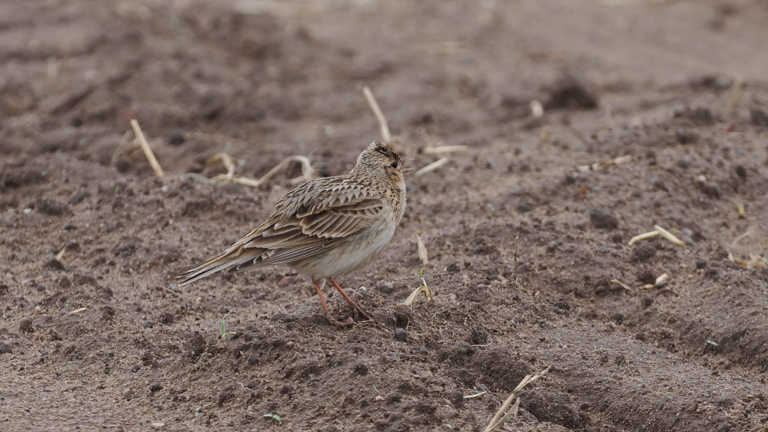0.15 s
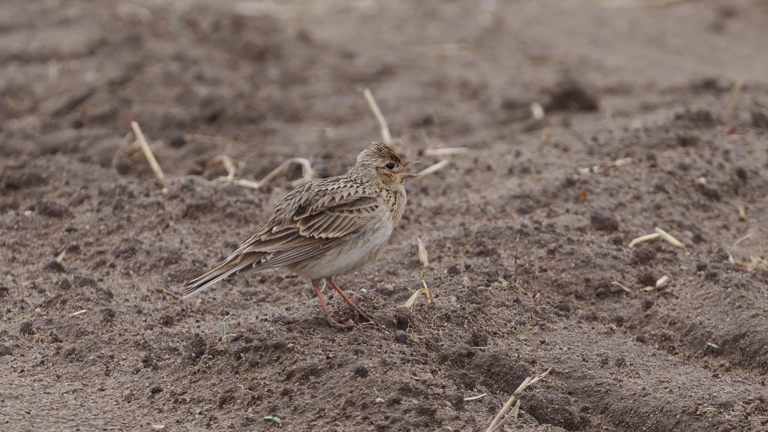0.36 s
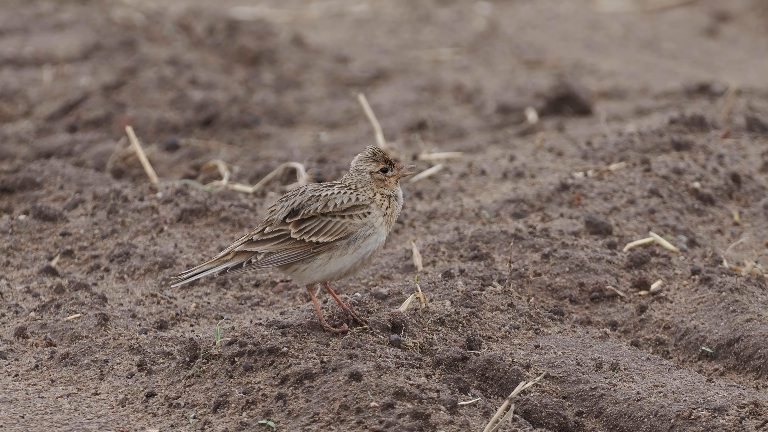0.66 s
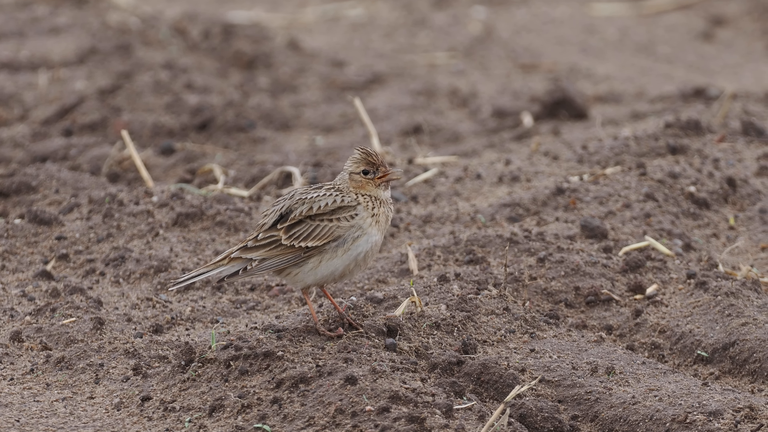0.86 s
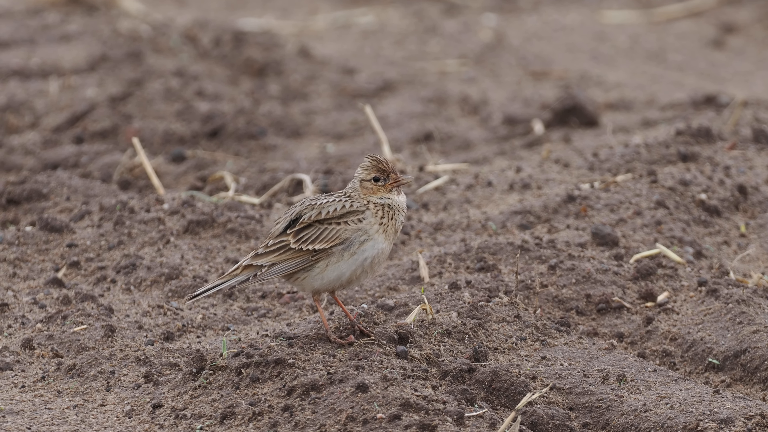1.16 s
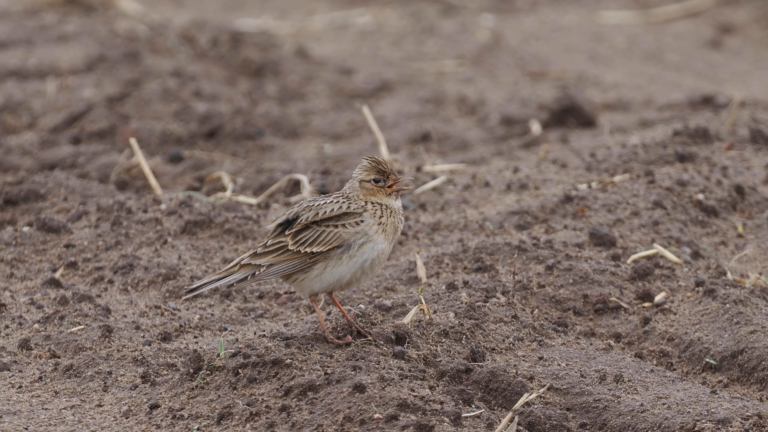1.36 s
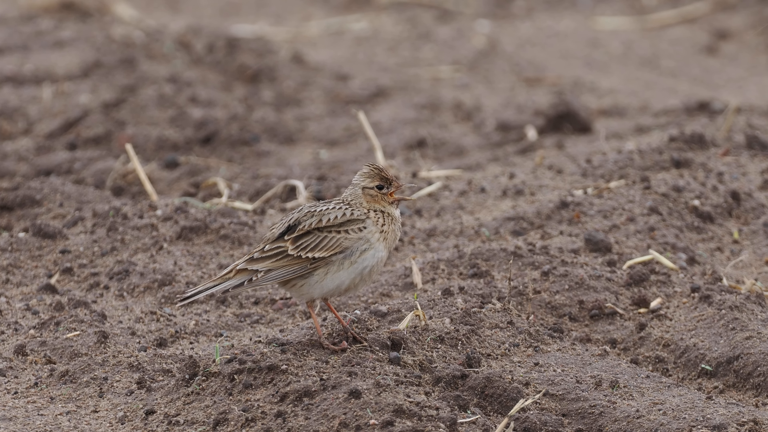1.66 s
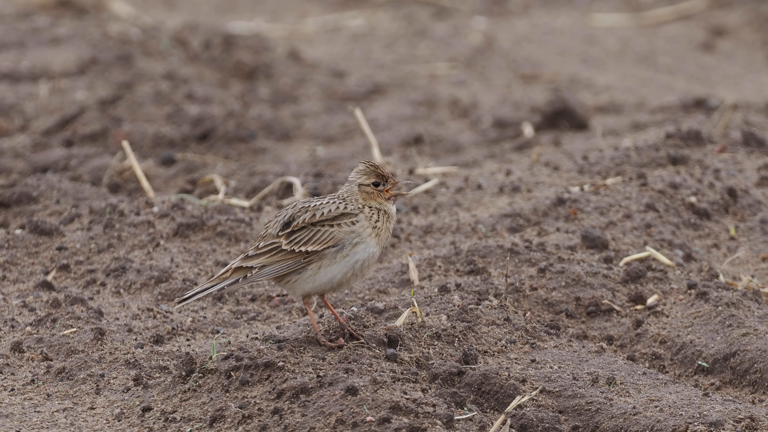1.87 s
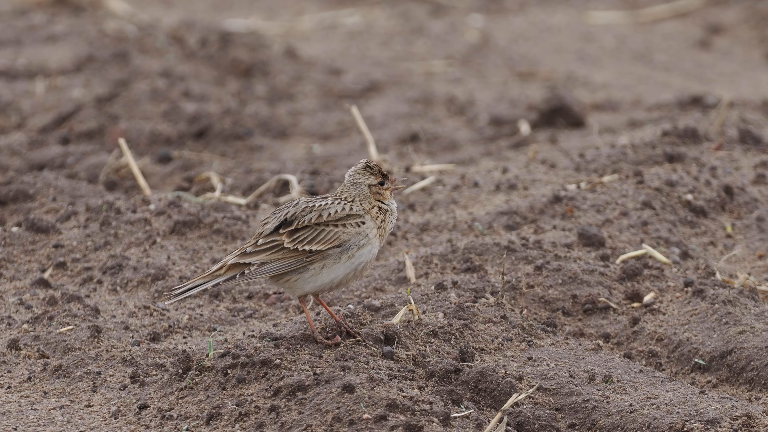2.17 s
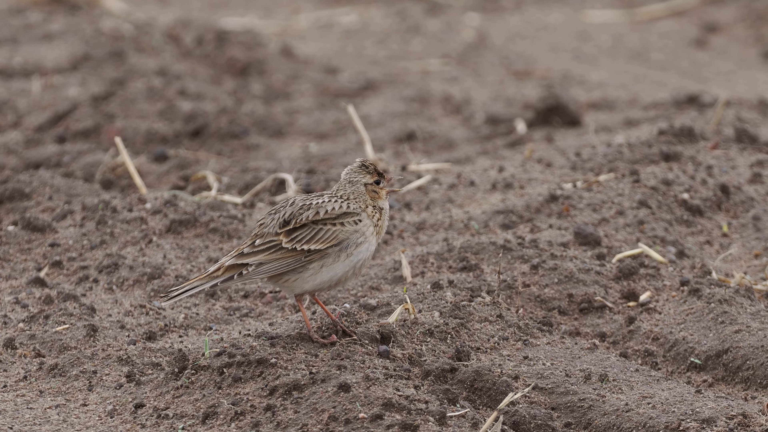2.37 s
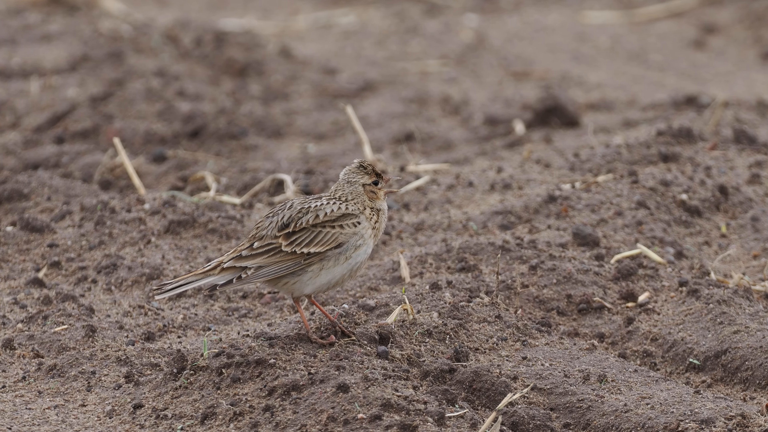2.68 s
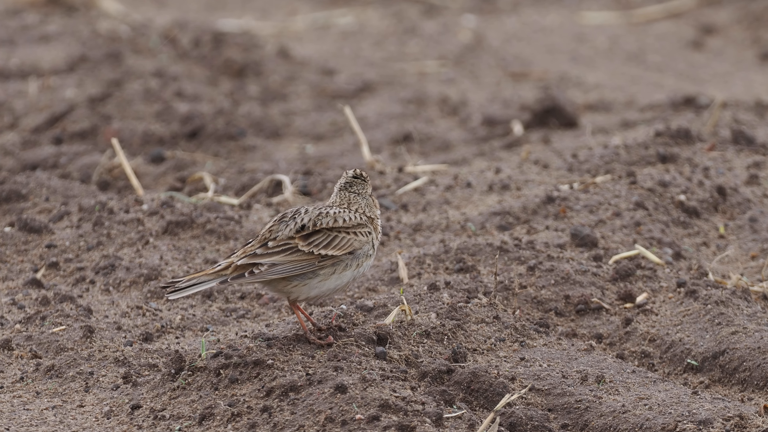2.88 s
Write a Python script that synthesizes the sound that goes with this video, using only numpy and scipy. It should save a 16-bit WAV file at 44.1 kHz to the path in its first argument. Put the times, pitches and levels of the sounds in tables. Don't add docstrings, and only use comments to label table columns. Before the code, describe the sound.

Skylark song pours out without pause, rough churrs, falling buzzes and clear whistles, with low wind gusts.

```python
import sys
import numpy as np
from scipy import signal
from scipy.io import wavfile
from scipy.ndimage import uniform_filter1d

SR = 44100
rng = np.random.default_rng(int(sys.argv[2]) if len(sys.argv) > 2 else 0)


def dump_mix(stems):
    frames = np.atleast_2d(stems).T
    limited = np.clip(frames, -1, 1)
    pcm = np.round(limited * 32767).astype(np.int16)
    wavfile.write(sys.argv[1], SR, pcm)


def linear_from_db(decibels):
    return 10 ** (np.asarray(decibels, float) / 20)


N = 132300

# pitch_hz, level_db
THROAT = [(2000, -3), (3000, 0), (5200, 0), (6300, -14), (7500, 1), (8800, -15), (15000, -17)]


def evened(x):
    return x / np.sqrt(np.mean(x ** 2) + 1e-20)


def read(points, hz):
    f, value = np.transpose(points)
    return np.interp(np.log(hz + 1), np.log(f + 1), value)


def add(mix, start_s, sound):
    k = round(start_s * SR)
    sound = sound[..., max(-k, 0):]
    part = mix[..., max(k, 0):][..., :sound.shape[-1]]
    part += sound[..., :part.shape[-1]]


def clock(length_s):
    return np.arange(0, length_s, 1 / SR)


def wobble(n, per_s):
    width = int(SR / per_s)
    smooth = uniform_filter1d(rng.standard_normal(n + 99), width)
    return evened(uniform_filter1d(smooth, width))[:n]


def soft_ends(t, rise_s, fall_s):
    ramp = np.minimum(t / rise_s, (t[-1] - t) / fall_s)
    return np.sin(np.pi / 2 * np.clip(ramp, 0, 1)) ** 2


def tone(hz, gain, over_db, beak=THROAT, shake_hz=25, shake_db=.8):
    shaky_hz = hz + shake_hz * wobble(len(hz), 600)
    phase = 2 * np.pi * (np.cumsum(shaky_hz) / SR + rng.random())
    partials = 0
    for k, db in enumerate((0, *over_db), 1):
        partials = partials + linear_from_db(db + read(beak, k * hz)) * np.sin(k * phase)
    shaky_gain = gain * linear_from_db(shake_db * wobble(len(hz), 510))
    return np.sqrt(2) * shaky_gain * partials


def glide(mix, at, level_db, notes, pitch=1, over_db=(-20, -30), shake_hz=60, shake_db=3.0):
    for after, length, from_hz, to_hz, db in notes:
        t = clock(length)
        sweep_hz = from_hz + (to_hz - from_hz) * (t / length) ** 0.97
        hz = pitch * sweep_hz * rng.uniform(0.97, 1.02)
        note_db = level_db + db + 0.86 * rng.standard_normal()
        gain = linear_from_db(note_db) * soft_ends(t, length * 0.37, length * 0.41)
        add(mix, at + after, tone(hz, gain, over_db, THROAT, shake_hz, shake_db))


def churrs():
    # start_s, head_db, tail_db, last_beat_s
    of_4 = [(1.2675, -17, -33.5, 1.370), (-.104, -30, -34, 0.01583)]
    of_5 = [(0.0603, -28.5, -35, .187), (0.2207, -26.5, -34.5, .338), (1.4144, -21.5, -34.5, 1.536),
            (1.9789, -23.5, -32.5, 2.100), (2.141, -24.5, -34.5, 2.256)]
    of_6 = [(0.3883, -23, -34, .527), (0.5716, -27.5, -34, .710)]
    # after_start_s, length_s, from_hz, to_hz, level_db
    head = [(-.002, 0.0073, 2800, 3800, -26.5), (0, 0.0051, 4200, 4870, -5),
            (.006, 0.0044, 5500, 3930, -11), (.0105, 0.006, 4340, 4650, -0.5),
            (.017, 0.0059, 5110, 4100, -15), (.0215, 0.0065, 4200, 4440, -1),
            (.029, 0.0077, 5390, 3610, -10.5), (.0325, 0.0051, 3710, 3030, -11.5),
            (.0365, 0.006, 3340, 4370, -19.5), (.0435, 0.004, 4900, 3580, -16)]
    # after_beat_s, length_s, from_hz, to_hz, level_db
    beat = [
        (-.0005, .003, 4700, 3500, -12),
        (.0018, 0.004, 3500, 2300, 0.5),
        (.0065, 0.0072, 2250, 3300, 0.5),
        (.0135, 0.005, 3150, 3100, -14),
    ]
    beat_s, hurry_s, sink = .0193, 0.0027, 0.028
    out = np.zeros(N)
    for beats, syllables in enumerate((of_4, of_5, of_6), 4):
        for start, head_db, tail_db, end in syllables:
            glide(out, start, head_db, head, over_db=(-24, -40), shake_hz=40.7, shake_db=2.13)
            for k in range(beats):
                last = k == beats - 1
                at = end - (beats - 1 - k) * beat_s + hurry_s * (k == 0)
                notes = beat[:2] if last else beat
                glide(out, at, tail_db - 9.2 * last, notes, 1.03 - sink * k, (-21, -26), 100, 2.7)
    return out


def slides():
    # start_s, length_s, level_db, buzz_per_s
    calls = [
        (0.744, 0.122, -16, 310),
        (0.9175, .135, -17, 304),
        (1.0888, .132, -15.5, 291),
    ]
    # time_s, top_hz, level_db, buzz_depth_hz, doubled_share
    shape = [(0, 4960, -13, 555, 0), (0.02, 5190, 0.5, 705, 0.25), (0.048, 4780, -2.5, 744, 0),
             (0.06, 4400, -6, 814, 0), (0.069, 4100, -11, 1000, .9), (0.08, 3403, -17, 934, .8),
             (0.101, 2950, -15, 652, 0.18), (0.135, 2566, -20, 427, 0)]
    # time_s, share_of_starting_rate
    buzz_speed = [(0, 1), (.05, .895), (.095, .88), (.136, .68)]
    dip_depth, lag_rad, skew, narrow = .88, .6, .45, 1.4
    out = np.zeros(N)
    s, top_hz, db, depth_hz, double = np.transpose(shape)
    for start, length, level_db, rate in calls:
        t = clock(length)
        phase = 2 * np.pi * np.cumsum(rate * np.interp(t, *np.transpose(buzz_speed))) / SR
        twice = np.clip(np.interp(t, s, double), 0, 1)
        pitch_dip = (.5 + .5 * np.cos(phase + lag_rad)) ** 1.3
        hz = np.interp(t, s, top_hz) - np.interp(t, s, depth_hz) * pitch_dip
        single_dip = (.5 + .5 * np.cos(phase + skew * np.cos(phase))) ** narrow
        double_dip = .5 + .5 * np.cos(2 * phase + 2 * lag_rad)
        dip = (1 - twice) * single_dip + twice * double_dip
        gain = linear_from_db(level_db + np.interp(t, s, db)) * (1 - dip_depth * dip)
        gain = gain * soft_ends(t, 0.0062, 0.0029)
        add(out, start, tone(hz, gain, (-24, -26), shake_hz=25 + 400 * t, shake_db=.3 + 9 * t))
    return out


def runs():
    # start_s, level_db, pitch_share
    phrases = [
        (1.576, -27.5, 1),
        (1.707, -26, 0.99),
        (1.842, -26.5, 1.01),
    ]
    # after_start_s, length_s, from_hz, top_hz, level_db
    steps = [
        (-.001, 0.01, 2050, 2900, 0),
        (.010, 0.0096, 2820, 3760, 3),
        (0.015, 0.015, 2815, 3514, -2.5),
        (0.028, 0.024, 2590, 3360, -6),
        (.044, .015, 2410, 2820, 1.5),
        (.0625, 0.018, 2160, 2536, -0.5),
        (0.081, .019, 2060, 2148, -5.5),
    ]
    # pitch_hz, level_db
    beak = [(2000, -17), (3700, -15), (5000, 0.5), (6400, -20), (7400, -15.5), (9500, -48), (12000, -19.5),
            (14000, -44)]
    rise_s, sag = 0.0025, 0.052
    out = np.zeros(N)
    for start, level_db, pitch in phrases:
        for after, length, from_hz, top_hz, db in steps:
            t = clock(length)
            hook_hz = top_hz - (top_hz - from_hz) * np.exp(-t / rise_s)
            hz = pitch * hook_hz * (1 - sag * (t / 0.013) ** 2)
            gain = linear_from_db(level_db + db) * soft_ends(t, 0.0012, 0.0066)
            add(out, start + after, tone(hz, gain, (-1.5, -7, -6.0, -15), beak, shake_db=2.66))
        out += second_voice(start, level_db)
    return out


def second_voice(start, level_db):
    # after_start_s, length_s, from_hz, to_hz, level_db
    crossings = [
        (.009, 0.0032, 5400, 4000, -5.5),
        (.012, 0.0044, 4300, 3480, -10),
        (.018, 0.004, 5300, 4040, -13),
        (.030, 0.0025, 4800, 5400, -18.5),
        (.080, .003, 4400, 4400, -28),
        (.011, 0.0036, 6440, 7710, -11.5),
        (.020, .005, 6200, 7600, -15),
        (.031, .005, 5500, 6900, -7),
    ]
    out = np.zeros(N)
    glide(out, start, level_db, crossings)
    return out


def trill():
    # time_s, pitch_hz, level_db
    lead = [(2.32, 6410, -26.5), (2.329, 6450, -40.5), (2.329, 6390, -23), (2.342, 6390, -25),
            (2.351, 5650, -29.5), (2.3518, 5600, -23), (2.357, 4840, -22), (2.362, 4280, -45),
            (2.365, 3360, -34.5)]
    start_s, end_s, per_s = 2.3635, 2.424, 92.4
    centre_hz, swing_hz, level_db = 4400, 1140, -23
    beak_hz, beak_wide_hz, floor_db = 4900, 486, -18.5
    out = np.zeros(N)
    s, lead_hz, db = np.transpose(lead)
    t = np.arange(s[0], s[-1], 1 / SR)
    pulse = .5 + .5 * np.cos(2 * np.pi * 210 * (t - 2.3335))
    flutter = 1 - .5 * np.clip((2.35 - t) / 0.0043, 0, 1) * pulse
    gain = linear_from_db(np.interp(t, s, db)) * flutter * soft_ends(t - s[0], .001, 0.0042)
    add(out, s[0], tone(np.interp(t, s, lead_hz), gain, (-24, -40)))
    t = clock(end_s - start_s)
    zigzag = np.arcsin(.97 * np.cos(2 * np.pi * per_s * t)) / 1.3
    hz = centre_hz - swing_hz * zigzag
    beak = np.exp(-((hz - beak_hz) / beak_wide_hz) ** 2) + linear_from_db(floor_db)
    gain = linear_from_db(level_db) * beak * soft_ends(t, 0.012, .012)
    add(out, start_s, tone(hz, gain, (-28, -40), shake_hz=80, shake_db=-5.2))
    return out


def whistles():
    # start_s, length_s, level_db, top_hz, fall_hz
    notes = [
        (2.452, 0.029, -22, 4900, 461),
        (2.499, 0.025, -23, 4934, 343),
        (2.541, 0.032, -23.5, 4890, 246),
        (2.586, .034, -24.5, 4826, 219.6),
        (2.629, .036, -27, 4768, 154.2),
        (2.721, 0.016, -30.5, 4596, 190),
    ]
    out = np.zeros(N)
    for start, length, db, top_hz, fall_hz in notes:
        t = clock(length)
        hz = top_hz - fall_hz * (t / length) ** 2.4 - 60 * np.exp(-t / 0.0034)
        gain = linear_from_db(db) * soft_ends(t, .008, .006)
        add(out, start, tone(hz, gain, (-24, -22), shake_hz=10, shake_db=.4))
    return out


def warble():
    # start_s, low_hz, top_hz, low_db, top_db
    beats = [
        (2.737, 3113, 4420, -34, -36.5),
        (2.7629, 2994, 4430, -36.5, -38),
        (2.7895, 2940, 4214, -38.5, -44.5),
        (2.8165, 2763, 4120, -39.5, -40),
        (2.842, 2880, 3940, -39.5, -39.5),
        (2.868, 2800, 3805, -38.5, -39),
        (2.896, 2766, 3640, -38, -37),
        (2.9223, 2764, 3810, -39, -40.5),
        (2.947, 2767, 2825, -42.5, -58.5),
    ]
    # time_s, share_of_climb, share_of_top_level, level_db
    shape = [(0, 0, 0, -5), (.003, .04, 0, 0), (.0105, 0, 0, -1), (.0135, .35, .5, -6), (.016, .93, 1, -3),
             (.0195, 1, 1, 0), (.021, .8, 1, -3), (.023, .05, .6, -1), (.0255, -.2, .5, -10)]
    hook_share, hook_s = .22, .0013
    out = np.zeros(N)
    s, climb, share, db = np.transpose(shape)
    t = clock(s[-1])
    for at, low_hz, top_hz, low_db, top_db in beats:
        arch_hz = low_hz + (top_hz - low_hz) * np.interp(t, s, climb)
        hz = uniform_filter1d(arch_hz, size=50) - hook_share * low_hz * np.exp(-t / hook_s)
        beat_db = low_db + (top_db - low_db) * np.interp(t, s, share) + np.interp(t, s, db)
        gain = linear_from_db(beat_db) * soft_ends(t, 0.0039, 0.0014)
        add(out, at, tone(hz, gain, (-17, -30), shake_hz=35, shake_db=1.6))
    return out


def band_noise(low_hz, high_hz):
    sos = signal.butter(3, (low_hz, high_hz), "band", fs=SR, output="sos")
    return evened(signal.sosfilt(sos, rng.standard_normal((2, N))))


def rasp(song):
    breath = band_noise(6760, 7860) + linear_from_db(-13.5) * band_noise(9000, 13500)
    strength = np.abs(uniform_filter1d(song ** 2, 60)) ** 0.43
    return linear_from_db(-32.5) * breath * strength


def field(song):
    echo_db, echo_t60_s = -17, .09
    t = np.arange(int(.3 * SR)) / SR
    decay = linear_from_db(-60 * t / echo_t60_s) * np.clip(t / .011, 0, 1)
    tail = rng.standard_normal((3, len(t))) * decay
    taps = linear_from_db(echo_db) * (tail[:2] * .9 + tail[2] * .8) / np.linalg.norm(tail[2])
    taps[0, 1] += 1
    taps[1, 0] += 1
    return signal.fftconvolve(song[None], taps, axes=1)[:, :N]


def noise(shape_db, same, port, size, patchy_db):
    frames, hz = N * 4 // size + 5, np.fft.rfftfreq(size, 1 / SR)
    a, b, c, d, patch = rng.standard_normal((frames, len(hz), 5)).T
    patch = evened(uniform_filter1d(uniform_filter1d(patch, 12, 0), 10, 1))
    like = np.clip(same(hz), -1, 1)[:, None]
    left = a + 1j * b
    right = port(hz)[:, None] * (like * left + np.sqrt(1 - like ** 2) * (c + 1j * d))
    z = np.array([left, right]) * linear_from_db(shape_db(hz)[:, None] + patchy_db * patch)
    return evened(signal.istft(z, nperseg=size, noverlap=size * 3 // 4)[1][:, :N])


def gusts():
    # time_s, length_s, level_db, left_over_right_db, top_hz
    thumps = [
        (0.598, 0.046, -40, -38, 145),
        (0.674, 0.014, -29.5, -57, 244),
        (0.696, 0.0089, -26, -39, 262),
        (1.242, 0.052, -42, -26, 145),
        (1.901, 0.029, -44, -18, 168),
        (2.035, 0.056, -37, -35, 176),
        (2.347, 0.034, -37, -26, 191),
        (2.412, 0.031, -32.5, 12.5, 178),
        (2.917, 0.051, -38.5, -37, 193),
        (2.99, 0.017, -38, -30, 187),
    ]
    out = np.zeros((2, N))
    for at, length, db, pan_db, top_hz in thumps:
        t = np.arange(-2 * length, 2 * length, 1 / SR)
        sos = signal.butter(4, (40, top_hz), "band", fs=SR, output="sos")
        lump = signal.sosfilt(sos, rng.standard_normal(len(t) + 4000))[4000:]
        lump = evened(lump * np.exp(-(t / length) ** 2 * 2)) * linear_from_db(db)
        add(out, at - 2 * length, lump * linear_from_db([[min(pan_db, 0)], [min(-pan_db, 0)]]))
    return out


def wind():
    # pitch_hz, level_db_per_hz
    rumble = [(15, -9), (45, 2), (75, -0.5), (170, -26.5), (500, -78.5)]
    # time_s, level_db
    strength = [(0.0, -46), (0.3, -37.5), (0.32, -45.5), (0.54, -38), (0.59, -48.5), (0.68, -32),
                (0.88, -44), (1.12, -43), (1.19, -50.5), (1.32, -35.5), (1.42, -44.5), (1.67, -41.5),
                (1.71, -44.5), (2.05, -40), (2.19, -39.5), (2.42, -30), (2.51, -38.5), (3.0, -36)]
    s, db = np.transpose(strength)
    turbulence = noise(lambda hz: read(rumble, hz), lambda hz: 0.58 + 0 * hz,
                       lambda hz: linear_from_db(2.0) + 0 * hz, size=4096, patchy_db=3.0)
    return turbulence * linear_from_db(np.interp(np.arange(N) / SR, s, db) + 2.0) + gusts()


def air():
    # pitch_hz, level_db_per_hz
    roar = [(150, 1), (400, -4.5), (1000, 0), (1900, -10), (3500, -22), (6300, -24.5), (8000, -26.5),
            (16000, -29.5)]
    # pitch_hz, likeness
    likeness = [(150, .5), (600, .85), (2500, .6), (7000, .1)]
    # pitch_hz, lead_rad
    lead = [(0, 0.35), (600, -0.2), (1290, -1.03), (2500, -1.2), (3360, 0.58), (3700, -1.4), (3960, -0.2),
            (5940, -2.2)]
    # pitch_hz, level_db
    tilt = [(150, -2.5), (500, 3.8), (1000, -2.25), (4000, 0)]

    def right_port(hz):
        return linear_from_db(-read(tilt, hz)) * np.exp(-1j * read(lead, hz))

    return linear_from_db(-48.5) * noise(lambda hz: read(roar, hz), lambda hz: read(likeness, hz),
                              right_port, size=1024, patchy_db=0.72)


def scene():
    rough = churrs() + runs() + trill() + warble()
    buzz = slides()
    song = field(rough + buzz + whistles())
    breath = rasp(rough + linear_from_db(-5.5) * buzz)
    return song + breath + wind() + air()


def roll_off(x):
    return signal.sosfilt(signal.butter(12, 15450, fs=SR, output="sos"), x)


def record(dry):
    return roll_off(dry)


dry = scene()
out = record(dry)
dump_mix(out)
```